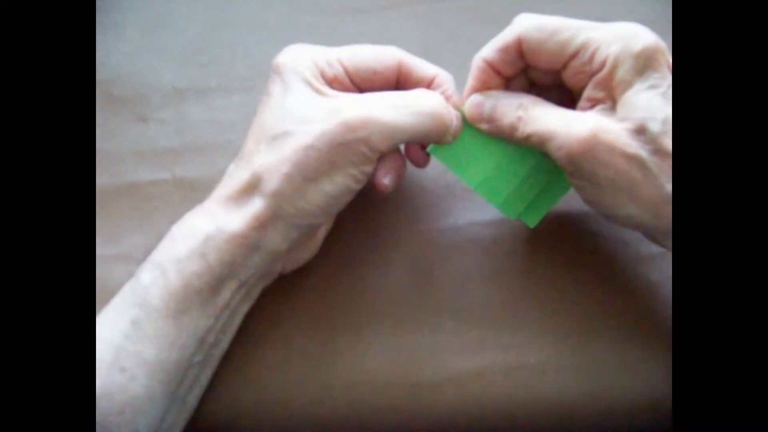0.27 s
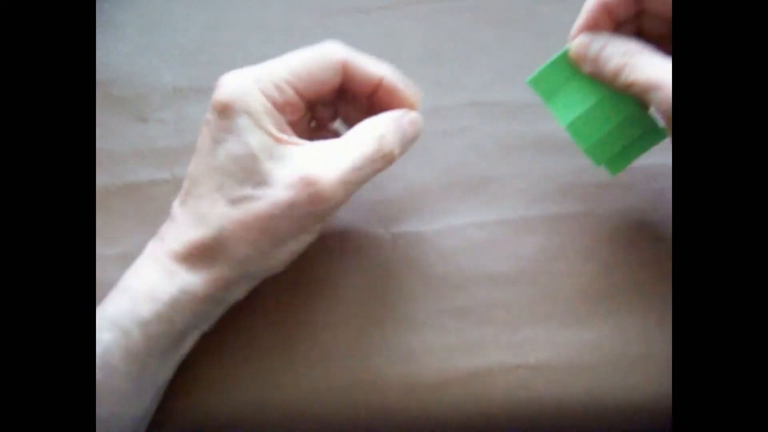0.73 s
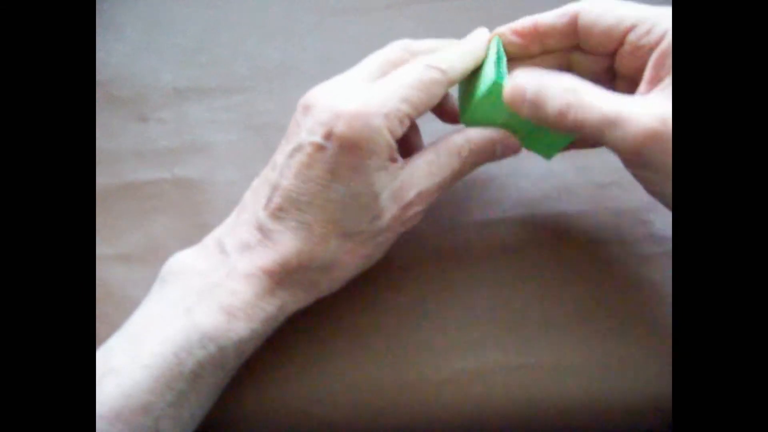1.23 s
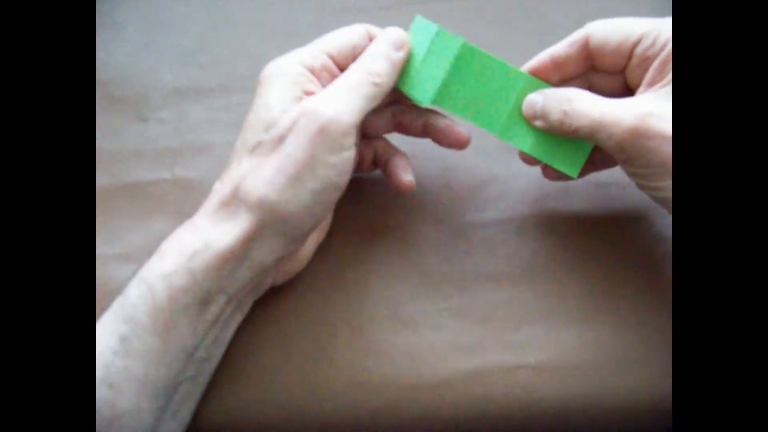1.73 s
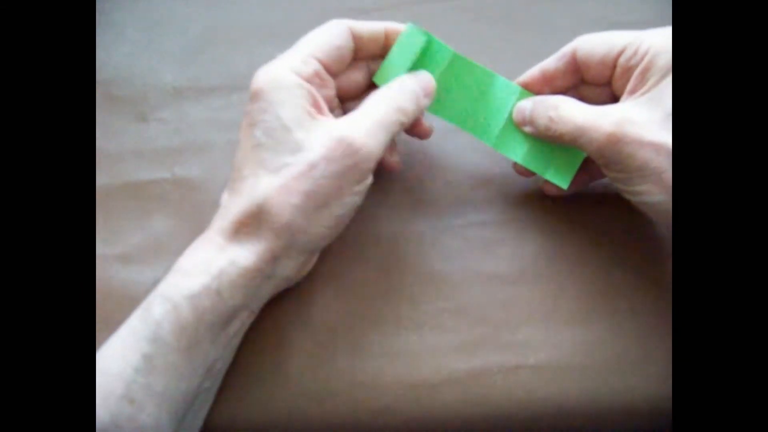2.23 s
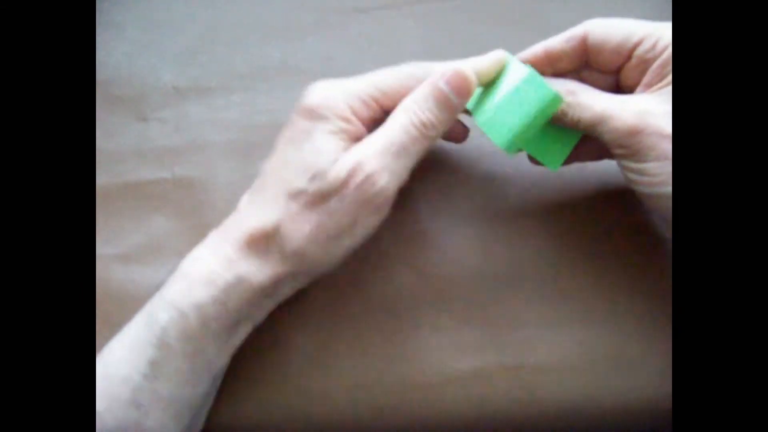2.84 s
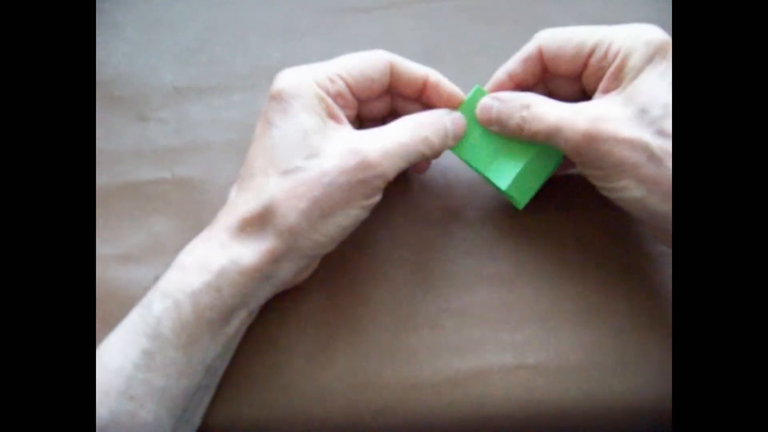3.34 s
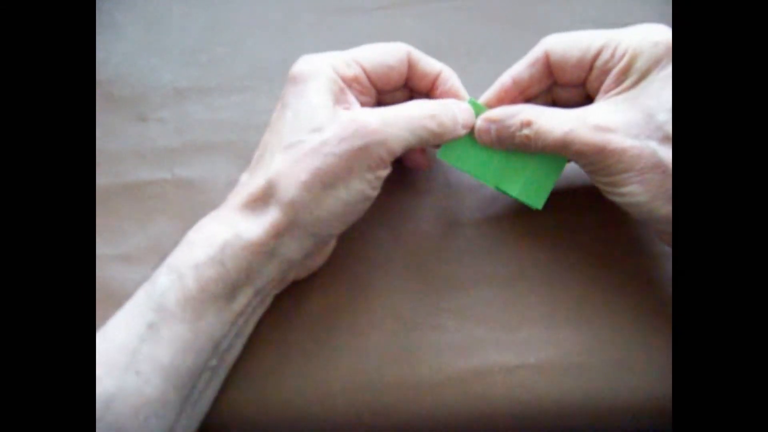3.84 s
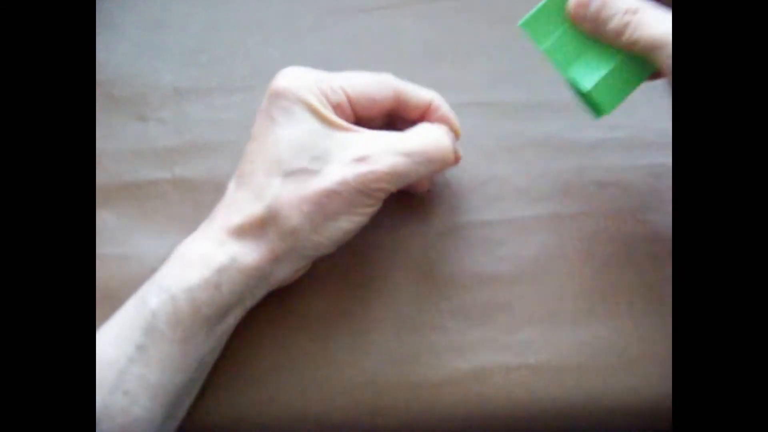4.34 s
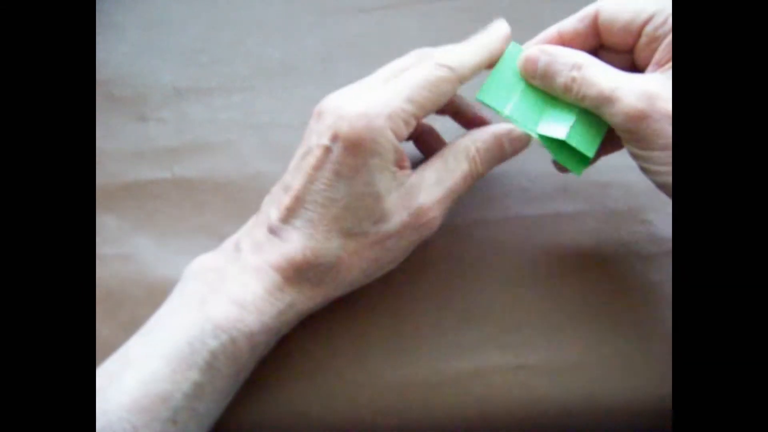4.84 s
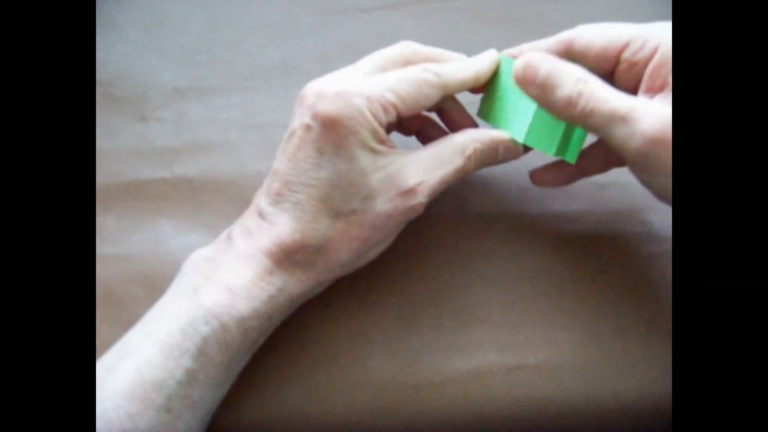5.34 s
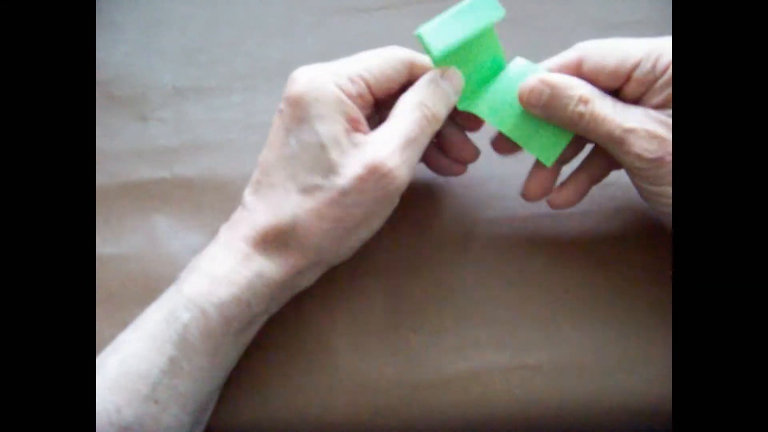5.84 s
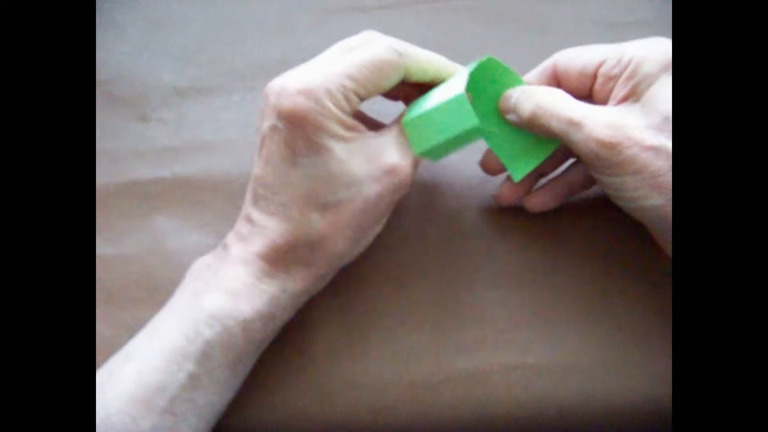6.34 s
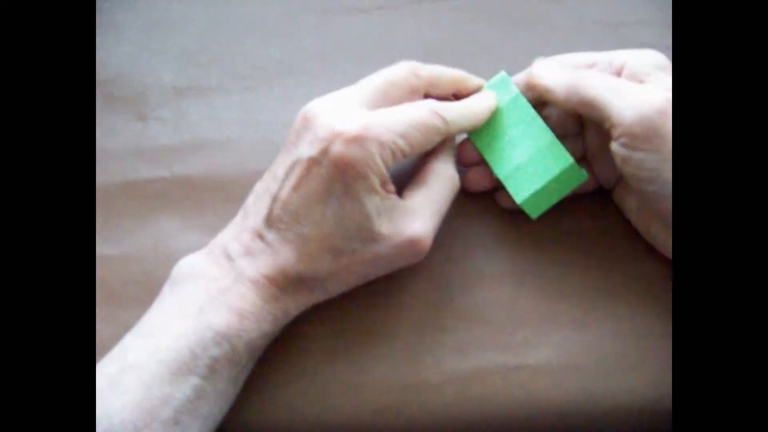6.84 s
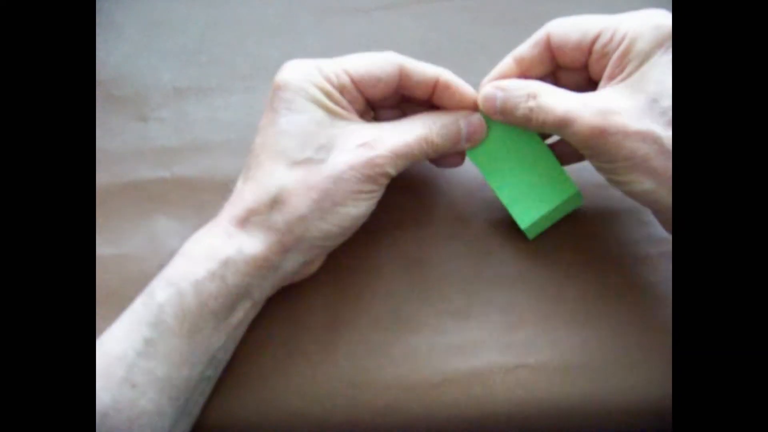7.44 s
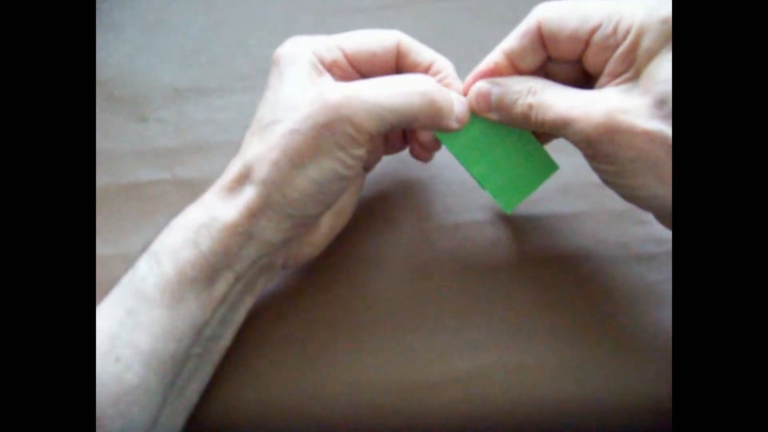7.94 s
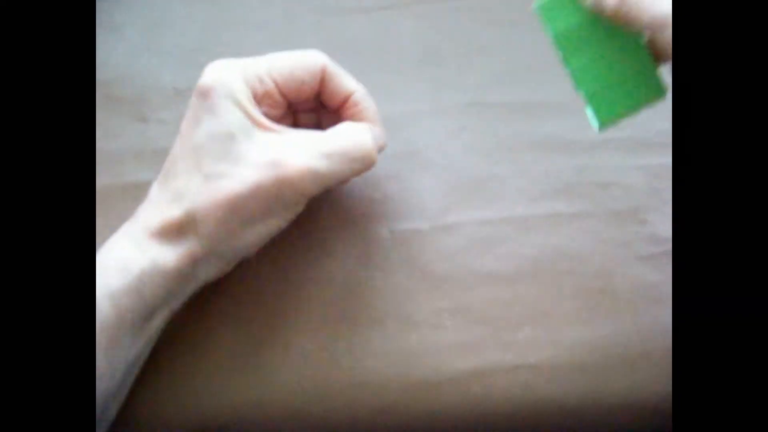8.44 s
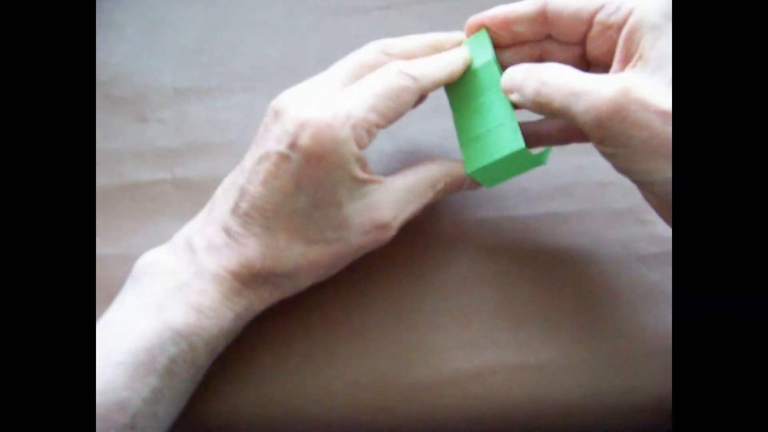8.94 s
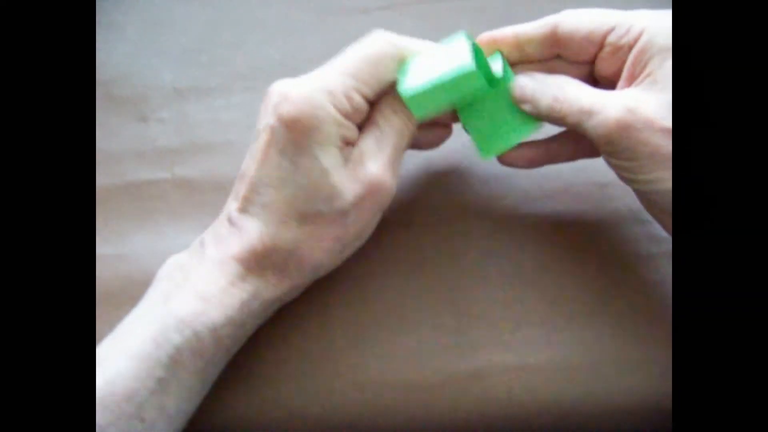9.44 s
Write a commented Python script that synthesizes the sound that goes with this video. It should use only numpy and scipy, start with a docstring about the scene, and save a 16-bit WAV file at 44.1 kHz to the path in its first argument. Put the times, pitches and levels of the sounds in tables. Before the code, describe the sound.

Close, dry handling of stiff folded card: sharp clicks and pops, small crackles and brief skin-on-paper strokes over low room hum.

```python
"""A faint humming room and light finger rub come first; then strokes and short snaps of folded stiff card.
Sliding: stick-slip grains through card and sheet resonances. Snaps: bursts of cracks ringing card facets.
Room: coloured noise, narrow noise hums and a brief far drone; short bounces and a diffuse tail echo the card.
A close, small stereo microphone pair with a narrow band and little headroom picks it up."""
import sys
import numpy as np
from scipy import signal
from scipy.fft import rfft, irfft, next_fast_len
from scipy.io import wavfile

SR = 44100
rng = np.random.default_rng(int(sys.argv[2]) if len(sys.argv) > 2 else 0)


def boost(x):
    """Linear amplitude factor 10**(x/20) for a level x in decibels (scalar or array-like)."""
    u = np.asarray(x, float) / 20
    return 10 ** u


def transcribe(u):
    """Save the signal u as a 16-bit wav file named by the first command-line argument.

    u: samples, shape (n,) or (channels, n), limited to [-1, 1]; the rate is SR.
    q: integer samples, one column per channel.
    """
    v = np.clip(np.atleast_2d(u).T, -1, 1)
    q = np.round(v * 32767).astype(np.int16)
    wavfile.write(sys.argv[1], SR, q)


N = 426888  # samples


def rms_one(x):
    """Scale to unit rms."""
    return x / np.sqrt(np.mean(x ** 2) + 1e-20)


def in_time(rows):
    """Interpolate curve columns to one value per sample; the first column is time in s."""
    time_s, *columns = np.transpose(rows)
    return [np.interp(np.arange(N) / SR, time_s, column) for column in columns]


def at_hz(points, hz):
    """Read a spectrum on a log-frequency axis."""
    point_hz, value = np.transpose(points)
    return np.interp(np.log(hz), np.log(point_hz), value)


def resonance(x, hz, width_hz):
    """Two-pole resonance, gain about 1 at its peak."""
    r = np.exp(-np.pi * width_hz / SR)
    poles = [1, -2 * r * np.cos(2 * np.pi * hz / SR), r * r]
    return signal.lfilter([(1 - r * r) / 2, 0, (r * r - 1) / 2], poles, x)


def drift(rate_hz):
    """Low-passed noise of unit rms: a slow random wander."""
    r = np.exp(-2 * np.pi * rate_hz / SR)
    wander = signal.lfilter([1], [1, -2 * r, r * r], rng.standard_normal(N + SR))
    return rms_one(wander[SR:])  # drop the filter's settling


# room tone spectrum, relative: hz, density_db_per_hz
AIR_SPECTRUM = [(15, 2.5), (32, 5), (55, 5.5), (110, 2), (220, -1), (450, -2.5), (800, -3), (1600, -6),
                (3200, -8), (6200, -11), (9000, -12.5)]
# left-right likeness of the air noise: hz, share_0_to_1
AIR_LIKENESS = [(60, 0.62), (300, 0.61), (1500, 0.23), (7000, 0)]
# wavering hums in the house: hz, width_hz (of each of two passes), level_db
HOUSE_HUMS = [(123.4, 19, -73.5), (185.76, 4.6, -73), (221.2, 7.1, -75)]
# low drone passing far off: time_s, level_db
FAR_DRONE = [(7.9, -90), (7.99, -65), (8.37, -72), (8.59, -60.5), (8.82, -68), (9.0, -93)]
AIR_RMS_DB, DRONE_HZ, DRONE_WIDTH_HZ = -57, 73.2, 14


def room_tone():
    """Coloured air noise partly shared by both ports, plus narrow-band noise hums and a far drone."""
    size = next_fast_len(N)
    hz = np.maximum(np.arange(size // 2 + 1) * SR / size, 1)
    mid, side = rfft(rng.standard_normal((2, size)))
    alike = np.clip(at_hz(AIR_LIKENESS, hz), 0, 1)
    pair = np.sqrt(1 + alike) * mid + np.sqrt(1 - alike) * side * np.array([[1], [-1]])
    coloured = irfft(pair * boost(at_hz(AIR_SPECTRUM, hz)), size)[:, :N]
    air = boost(AIR_RMS_DB) * rms_one(coloured)

    white = rng.standard_normal(N)
    hums = np.zeros(N)
    for hum_hz, width_hz, level_db in HOUSE_HUMS:
        hum = resonance(resonance(white, hum_hz, width_hz), hum_hz, width_hz)
        hums += boost(level_db) * rms_one(hum)

    drone_db, = in_time([(7.6, -110)] + FAR_DRONE + [(9.2, -110)])
    drone = resonance(resonance(white, DRONE_HZ, DRONE_WIDTH_HZ), DRONE_HZ, DRONE_WIDTH_HZ)
    return air + hums + boost(drone_db) * rms_one(drone)


# fingers shifting their hold between strokes: time_s, friction_db, flexing_db
HOLD_CURVE = [(0.0, -55, -66), (0.54, -62, -71), (0.7, -48, -64), (0.94, -68.5, -74), (1.56, -52, -65.5),
              (2.29, -60.5, -69), (4.26, -53, -60.5), (5.53, -58, -72.5), (5.85, -62.5, -56),
              (6.04, -64.5, -65), (7.57, -56, -58.5), (8.03, -70.5, -69), (9.25, -57.5, -70.5),
              (9.68, -48.5, -62)]
# strokes of skin and nail along the card: start_s, length_s, friction_db, brightness_db, flexing_db
CARD_STROKES = [(0.037, 0.0086, -54, 0, -54), (0.196, 0.1, -48, -3.5, -66.5), (0.38, 0.017, -52, -11, -76),
                (0.498, 0.0052, -51, -16, -58), (0.562, 0.052, -40.5, 1.5, -51),
                (0.676, 0.084, -44.5, -11, -47), (.82, 0.029, -52, -8, -44), (1.208, 0.057, -51, 5, -61.5),
                (1.295, 0.057, -42, 4.5, -68), (1.404, 0.054, -38.5, 2.5, -56), (1.493, 0.12, -38, 0, -64),
                (1.647, 0.046, -55, 1, -74), (1.792, 0.088, -46, 7.5, -78),
                (1.944, 0.018, -37.5, 7.5, -46.5), (2.015, 0.044, -49.5, 0, -54),
                (2.162, 0.044, -50.5, 8, -58), (2.308, 0.013, -55, -9, -46), (2.596, 0.027, -32, 2, -46.5),
                (2.757, 0.029, -45, -4, -55), (2.969, 0.17, -47, 9, -62), (3.36, 0.041, -55, 3, -58),
                (3.647, 0.022, -49, -10, -46), (3.702, 0.033, -71, -8, -45.5), (3.872, 0.027, -51, -4, -63),
                (4.184, 0.032, -43, 11, -81), (4.27, 0.089, -38.5, 6.5, -60.5),
                (4.355, 0.052, -45.5, -15, -43), (4.443, 0.057, -49.5, -7, -56),
                (4.65, 0.048, -50, 2, -61.5), (4.879, 0.048, -41, -10.5, -43),
                (5.193, 0.034, -47.5, 3, -54.5), (5.279, 0.048, -39, 4.5, -55.5),
                (5.589, .04, -47, 1.5, -53), (5.77, 0.042, -51, 11, -53.5), (5.87, 0.023, -30, 7, -47),
                (5.968, 0.1, -42.5, 5, -56), (6.244, 0.12, -50.5, 2, -75), (6.399, 0.13, -47, 0, -54),
                (6.524, 0.073, -48.5, -5.5, -59.5), (6.65, 0.044, -50.5, -9, -70),
                (6.734, 0.077, -47, -1, -71), (6.823, 0.042, -38.5, 4, -54), (6.894, 0.01, -37, -6, -48),
                (7.041, 0.016, -45, -4, -51.5), (7.132, 0.054, -43.5, 5.5, -62.5),
                (7.316, 0.0067, -48, 4.5, -70), (7.38, 0.005, -40, -13.5, -63),
                (7.435, 0.0091, -47, -8.5, -47), (7.546, 0.078, -47.5, -4, -57.5),
                (7.626, 0.01, -37.5, -2, -73), (7.727, 0.037, -61, -6, -50.5),
                (7.822, 0.014, -52.5, -11, -46), (8.302, .07, -38, 0, -58), (8.475, 0.079, -50.5, -3, -65),
                (8.789, 0.0067, -50, 6, -55.5), (8.948, 0.016, -54.5, 0, -59),
                (9.098, 0.013, -50, 4, -58.5), (9.189, 0.018, -54.5, 16.5, -63),
                (9.417, .07, -49.5, 4, -64.5), (9.526, 0.028, -33.5, 1, -47.5), (9.646, 0.12, -46, 14, -67)]
PRESS_DB_PER_S, LIFT_DB_PER_S = 901, 497.5  # stroke onset and release
# shivering after a snap: levels relative to the snap's peak, and settling rate
SHIVER_DB, SHIVER_FLEX_DB, SHIVER_DB_PER_S = -41, -42, 250


def handling():
    """Dull friction, bright friction and flexing gains: hold, strokes and shivers add in power."""
    t = np.arange(0, N, 32) / SR
    rows = [(*stroke, PRESS_DB_PER_S, LIFT_DB_PER_S) for stroke in CARD_STROKES]
    rows += [(start_s, 0, peak_db + SHIVER_DB, 0, peak_db + SHIVER_FLEX_DB, 1e5, SHIVER_DB_PER_S)
             for start_s, peak_db, *_ in CARD_SNAPS]
    start_s, length_s, friction_db, bright_db, flex_db, press, lift = np.transpose(rows)[:, :, None]
    shape_db = -press * np.maximum(start_s - t, 0) - lift * np.maximum(t - start_s - length_s, 0)
    hold_db, hold_flex_db = in_time(HOLD_CURVE)

    def gain(level_db, rest_db):
        """Root of the summed event and hold powers."""
        power = np.sum(boost(2 * (level_db + shape_db)), axis=0)
        return np.sqrt(np.interp(np.arange(N) / SR, t, power) + boost(2 * rest_db))

    dull = gain(friction_db - bright_db / 2, hold_db)
    bright = gain(friction_db + bright_db / 2, hold_db)
    return dull, bright, gain(flex_db, hold_flex_db)


def grains(per_s, spread_db):
    """Random slips with a long-tailed spread of sizes."""
    size = boost(spread_db * np.minimum(rng.exponential(1, N), 5))
    sign = rng.choice([-1, 1], N)
    return size * sign * (rng.random(N) < per_s / SR) + 1e-18


def through(x, modes, wander_db):
    """Parallel resonances of alternating sign, waxing and waning as the grip shifts; unit rms."""
    total = np.zeros(N)
    for k, (hz, width_hz, level_db) in enumerate(modes):
        gain = boost(level_db + wander_db * drift(3.54))
        total += (-1) ** k * gain * resonance(x, hz, width_hz)
    return rms_one(total)


# card resonances under friction, two dull then two bright: hz, width_hz, level_db
CARD_MODES = [(3024, 3450, 6.5), (4000, 1320, 2), (4940, 3060, 1.5), (6140, 3600, 9.5)]
# resonances of the flexing sheet: hz, width_hz, level_db
SHEET_MODES = [(437, 410, -9.5), (770, 226, 2.5), (1083, 1300, 1), (1830, 1070, 0)]


def sliding():
    """Dense stick-slip grains in clumps excite the card; sparser ones flex the sheet."""
    dull, bright, flexing = handling()
    clumps = drift(34)
    slips = grains(5000, spread_db=1.5) * boost(2.7 * clumps)
    slips += boost(8.5) * grains(30, spread_db=4.0)  # now and then a fibre breaks
    high_pass = signal.butter(4, 2000, "high", fs=SR, output="sos")
    slips = signal.sosfilt(high_pass, slips)  # tiny slips move no low modes
    card = dull * through(slips, CARD_MODES[:2], wander_db=0.0)
    card += bright * through(slips, CARD_MODES[2:], wander_db=3.0)
    flex_slips = grains(1500, spread_db=3.5) * boost(2.0 * clumps + 2.1 * drift(42))
    flex = through(flex_slips, SHEET_MODES, wander_db=1.84)
    return boost(-4.5) * card + flexing * flex


# buckling snaps: start_s, peak_db, ring_hz, tick_db (rms re ring), t60_s (of the cracks)
CARD_SNAPS = [(0.31, -36, 1390, -6, 0.007), (.055, -41, 2500, 8, .02), (.25, -34, 5500, 6.5, 0.013),
              (0.378, -42, 3810, 2, 0.033), (0.474, -34.5, 3030, 9, 0.0053), (.546, -21, 1400, 2.5, 0.02),
              (0.6115, -7, 6340, 9, 0.0093), (.689, -31.5, 1830, -9, 0.031),
              (0.8113, -31, 3040, -13, 0.029), (0.8203, -28, 2330, -3, 0.024),
              (1.398, -27.5, 4600, 6, 0.035), (1.43, -30, 1530, 10, .01), (1.6086, -20, 6100, 8, 0.054),
              (1.6195, -20.5, 3960, 5, 0.01), (1.891, -32, 5100, -12, 0.01), (2.051, -37, 2960, -6, .02),
              (2.08, -42.5, 1510, -19, 0.014), (2.1554, -21.5, 2640, 2, .006),
              (2.3004, -18.5, 2720, -4, 0.011), (2.543, -29, 6070, 5.5, 0.0049),
              (2.585, -23.5, 1420, 3.5, .015), (2.62, -17, 3130, 6, .02), (2.775, -30.5, 4180, 0, .02),
              (3.037, -30, 5270, 12, .017), (3.1417, -34, 3560, 7, 0.016), (3.1727, -3.5, 2780, 2.5, 0.033),
              (3.218, -9, 4840, 1, 0.0063), (3.2456, -25, 2550, 0, .025), (3.3487, -23, 1290, 3.5, 0.016),
              (3.3562, -23.5, 2980, 20, 0.0098), (3.3805, -27, 3140, 16, 0.0089),
              (3.528, -34, 1800, 2, .008), (3.6067, -19, 4440, -3.5, 0.016), (3.651, -30, 2870, -11, 0.026),
              (3.666, -26, 2950, -10, 0.023), (3.7013, -23, 1480, -1, 0.019),
              (3.727, -34.5, 4500, -3, 0.02), (4.1656, -28, 3110, 6, .02), (4.2114, -32.5, 1060, 8, 0.016),
              (4.2965, -14.5, 4240, -2, 0.0098), (4.349, -2, 5610, 12.5, 0.0017),
              (4.405, -35, 1890, -7, 0.017), (4.511, -37, 2500, 11, 0.0089),
              (4.5466, -32.5, 3780, 2, 0.012), (4.5768, -29.5, 2020, 0, 0.024),
              (4.667, -36, 4450, -11, 0.016), (4.686, -28.5, 4340, -12, 0.0091),
              (4.735, -29.5, 4470, 5, 0.016), (4.8763, -18.5, 5400, 7, 0.0042),
              (4.9127, -11.5, 1560, 6.5, 0.024), (4.9275, -20, 3370, 3, 0.028),
              (4.9898, -18, 4320, 4.5, 0.006), (5.114, -31.5, 4830, 27, 0.015),
              (5.2365, -25, 1130, 9, 0.01), (5.2803, -25, 4600, 0, .012), (5.311, -27, 4260, 3.5, 0.01),
              (5.3294, -27, 4200, -1, 0.006), (5.36, -36, 4300, 6, .012), (5.484, -38.5, 4250, -2, 0.0091),
              (5.573, -27.5, 4050, 6, .035), (5.621, -20, 3070, -1, 0.066),
              (5.6359, -1.5, 3230, 6.5, 0.0043), (5.639, -33.5, 967, -17, 0.025),
              (5.65, -18.5, 4100, -2, 0.016), (5.74, -24.5, 4600, 4, 0.014), (5.7592, -23, 3580, 15, .04),
              (5.773, -29.5, 3530, -1, .03), (5.784, -17, 3570, 19.5, 0.013),
              (5.8048, -20, 3690, -4, 0.026), (5.83, -31, 3590, 1, 0.0068), (5.857, -29, 5900, 4.5, 0.023),
              (5.9245, -29, 3000, 3, 0.01), (6.125, -42, 1940, 2, .01), (6.344, -35.5, 1930, -4, 0.0071),
              (6.485, -34.5, 2720, -4, .008), (6.643, -40.5, 1440, -17, 0.071),
              (6.71, -23.5, 4520, -16, 0.0024), (6.8673, -8.5, 4590, 25, 0.021),
              (6.87, -25.5, 1080, -15, 0.055), (7.0301, -29.5, 3480, 0, .007),
              (7.132, -26.5, 5710, 13.5, 0.0054), (7.2558, -35, 1810, 5, .03),
              (7.343, -27, 4700, 11, 0.032), (7.3715, -19.5, 6420, 5, 0.068), (7.432, -16, 6520, 4, 0.018),
              (7.5406, -24.5, 1620, 20, .015), (7.577, -27.5, 3720, -2, .005), (7.64, -20, 6590, 0, 0.0064),
              (7.69, -28.5, 5460, 21, 0.062), (7.7244, -30.5, 2880, -18, 0.0041),
              (7.781, -38, 5500, 3, .01), (7.805, -30, 4020, 15, 0.053), (7.8242, -21, 1020, 8, .012),
              (8.092, -40, 5000, 15, 0.0047), (8.119, -39.5, 1740, -3, 0.0035),
              (8.2856, -19, 1960, 13, 0.0097), (8.3606, -2, 4340, 17, 0.01),
              (8.3625, -22.5, 770, 3, 0.0067), (8.783, -29, 3100, 23, 0.0081),
              (8.839, -33, 3320, 10, 0.017), (8.9586, -33, 913, -4, 0.0091),
              (9.5343, -10.5, 4800, 14, 0.018), (9.536, -32, 740, -7.5, 0.02)]
RISE_S, RISE_SHARE = 0.00052, 0.027  # swell time, plus this share of t60_s


def snaps(sharpness=5.1, tick_hz=3000, tick_breadth=1.8, thump_db=-24, spread_db=6.5):
    """A swelling, dying run of fibre cracks rings a card facet, with a broad tick and a thump."""
    length = 2048
    out, t = np.zeros(N + length), np.arange(length) / SR
    draws = rng.standard_normal((len(CARD_SNAPS), 2, length))
    cracks = draws[:, 0] * boost(spread_db * draws[:, 1])
    for (start_s, peak_db, ring_hz, tick_db, t60_s), crack in zip(CARD_SNAPS, cracks):
        rise_s = max(RISE_S + RISE_SHARE * t60_s, 1 / SR)
        decay_db = -60 * np.maximum(t - rise_s, 0) / np.clip(t60_s, .002, .08)
        run = crack * np.minimum(t / rise_s, 1) * boost(decay_db)
        ring = resonance(run, ring_hz, ring_hz / sharpness)
        ring = resonance(ring, ring_hz, 2 * ring_hz / sharpness)
        centre_hz = np.sqrt(ring_hz * tick_hz)  # big slow facets tick duller
        tick = resonance(run, centre_hz, tick_breadth * centre_hz)
        thump = resonance(run, 250, 530)  # the whole sheet gives a little
        snap = rms_one(ring) + boost(tick_db) * rms_one(tick) + boost(thump_db) * rms_one(thump)
        i = round(start_s * SR)
        out[i:i + length] += boost(peak_db) * snap / np.abs(snap).max()
    return out[:N]


LEFT_DB, RIGHT_LAG_S = 3.5, 3e-5  # mean left-right difference, right-port delay


def placed(x, restless_db=1.2):
    """The busy fingers are nearer the left port: louder and earlier there, with a wandering balance."""
    pan_db = LEFT_DB + restless_db * (drift(36) + drift(4.4))
    late = np.interp(np.arange(N) - RIGHT_LAG_S * SR, np.arange(N), x)
    return np.array([x * boost(pan_db / 2), late * boost(-pan_db / 2)])


ROOM_T60_S, ROOM_DB, TABLE_DB = 0.28, -9.5, -11  # tail decay, tail level, bounce level


def room(x, count=4):
    """Bounces off table and hands, mixed anew as the hands move, and a diffuse tail; sides differ."""
    t = np.arange(round(.4 * SR)) / SR
    noise = rng.standard_normal((count + 1, 2, len(t)))
    tail = noise[0] * boost(-60 * t / ROOM_T60_S) * np.minimum(t / 0.0023, 1)
    bounces = resonance(noise[1:], 4000, 9400) * boost(-60 * t / 0.02) * (t > .0005)
    bounces = bounces[:, :, :2048]
    shares = np.array([drift(3.24) for _ in bounces])
    shares = shares / np.linalg.norm(shares, axis=0)  # constant total power
    paths = [(boost(ROOM_DB), tail)]
    paths += [(boost(TABLE_DB) * share, bounce) for share, bounce in zip(shares, bounces)]
    wet = np.zeros((2, N))
    for gain, echo in paths:
        unit_echo = echo / np.linalg.norm(echo, axis=1, keepdims=True)
        wet += signal.oaconvolve(gain * x, unit_echo, axes=1)[:, :N]
    return wet


def scene():
    """Card sounds with their echoes over the room tone."""
    card = placed(snaps() + sliding())
    return card + room(card) + room_tone()


def roll_off(x):
    """The treble ends steeply here."""
    return signal.sosfilt(signal.butter(12, 16500, fs=SR, output="sos"), x)


# dips in the microphone response: hz, width_hz, depth_db
MIC_DIPS = [(292, 170, -23), (978, 36, -34)]
TOP_HZ, HEADROOM = 7498, .52  # steep top cut, clipping amplitude


def record(dry):
    """Microphone chain: dips, a steep top cut, then hard clipping where the loudest snaps overload it."""
    x = dry
    for hz, width_hz, depth_db in MIC_DIPS:
        x = x - (1 - boost(depth_db)) * resonance(x, hz, width_hz)
    x = signal.sosfilt(signal.cheby1(16, .5, TOP_HZ, fs=SR, output="sos"), x)
    x = np.clip(x, -HEADROOM, HEADROOM)
    return roll_off(x)


dry = scene()
out = record(dry)
transcribe(out)
```